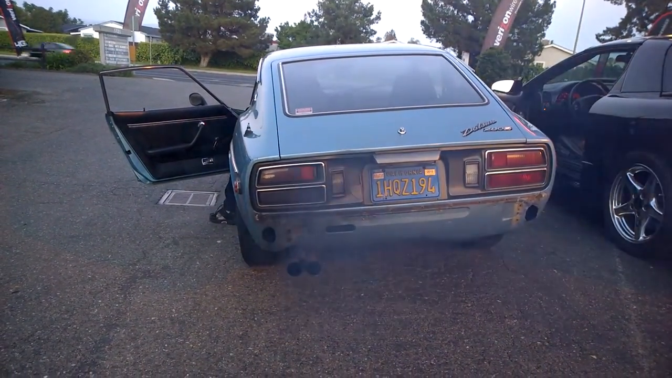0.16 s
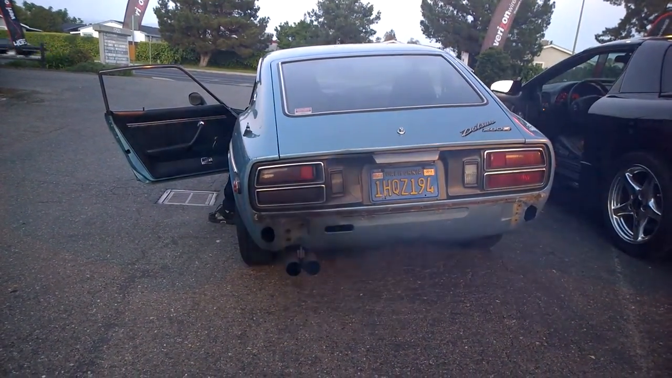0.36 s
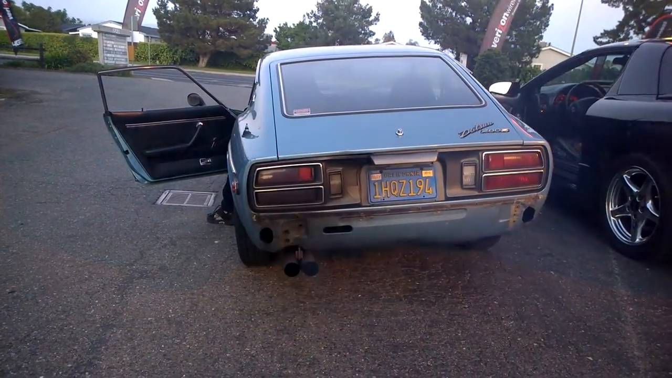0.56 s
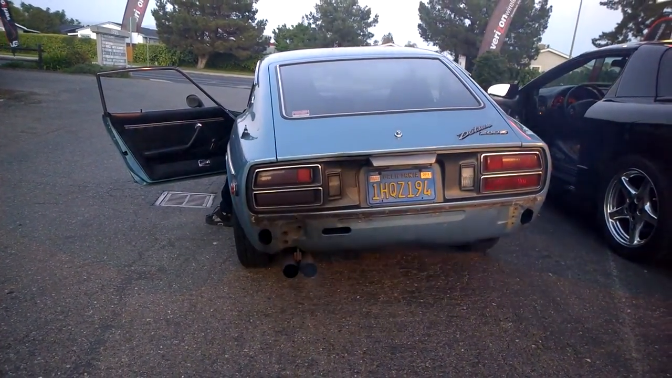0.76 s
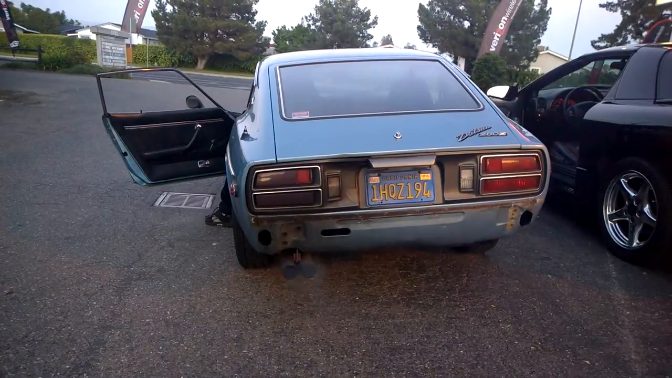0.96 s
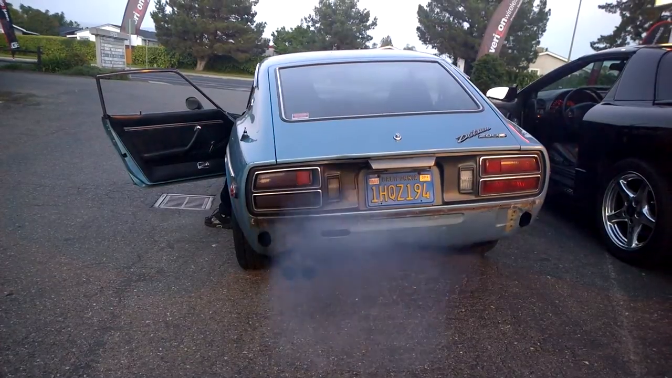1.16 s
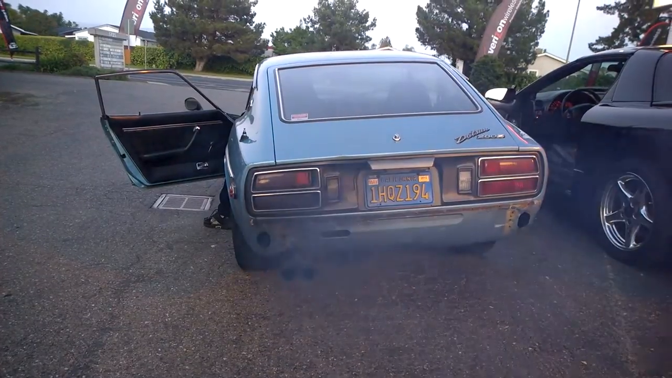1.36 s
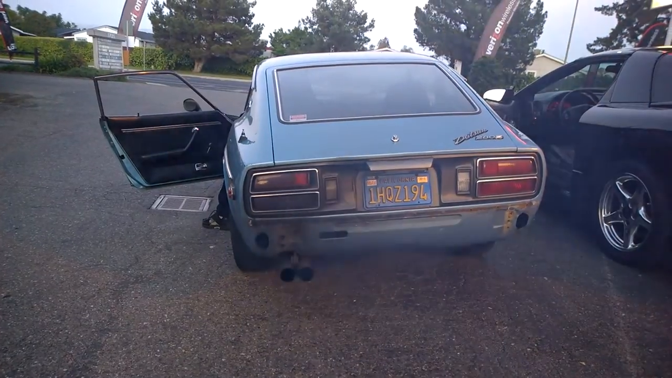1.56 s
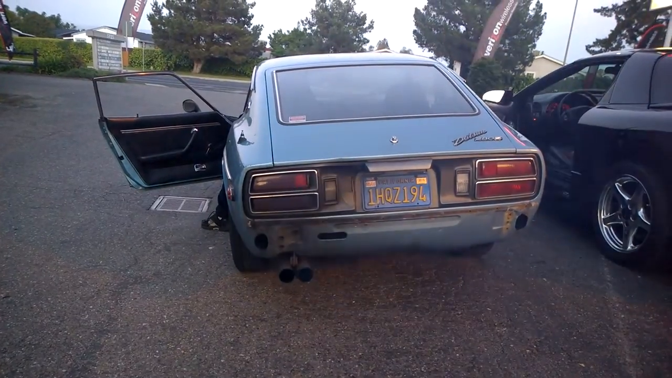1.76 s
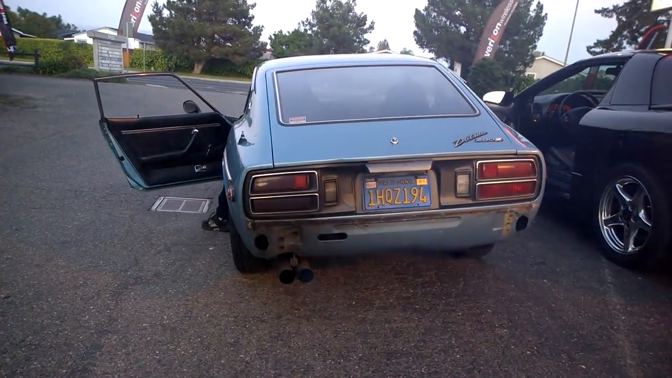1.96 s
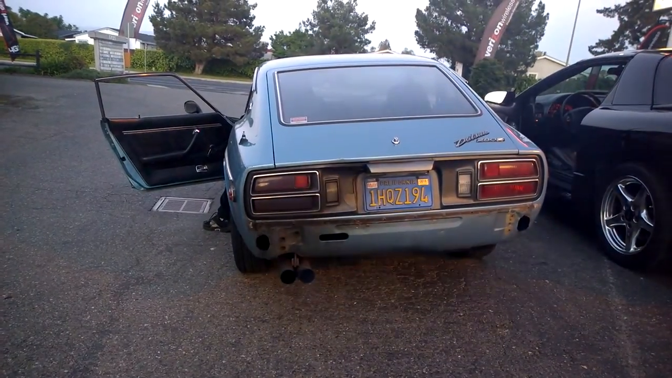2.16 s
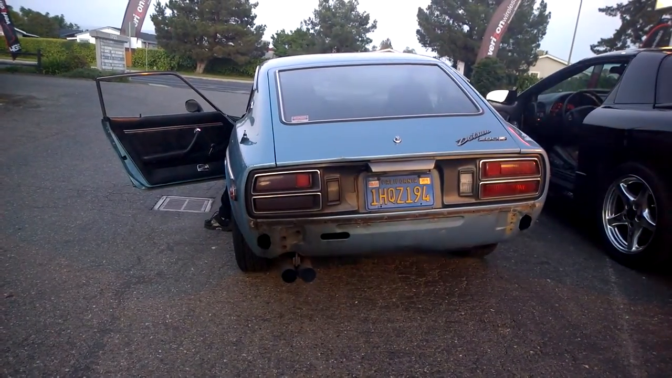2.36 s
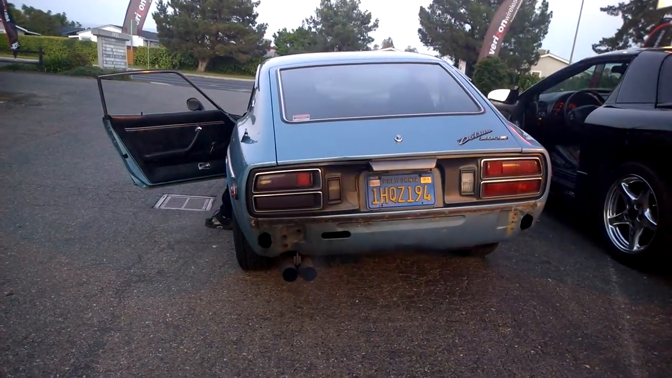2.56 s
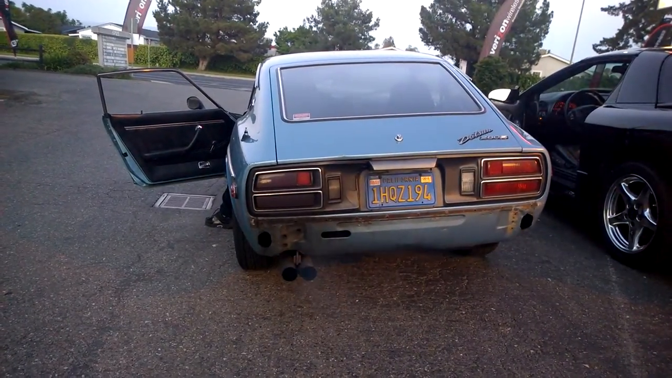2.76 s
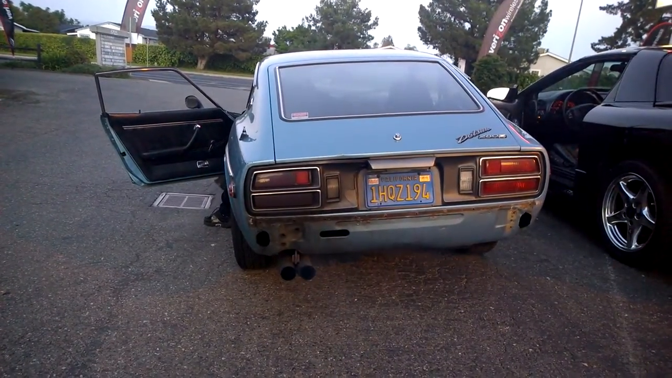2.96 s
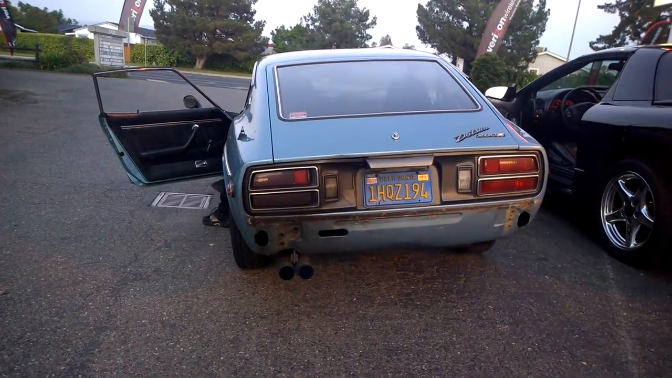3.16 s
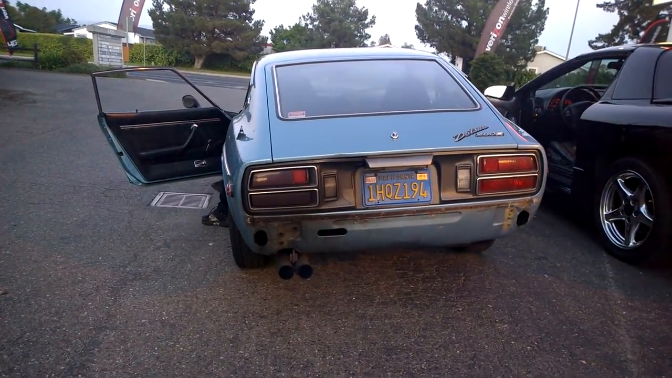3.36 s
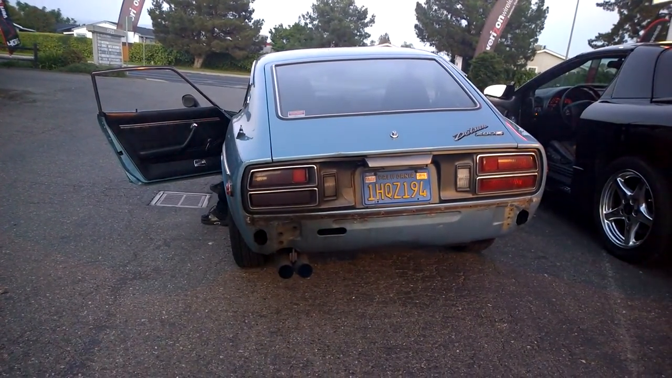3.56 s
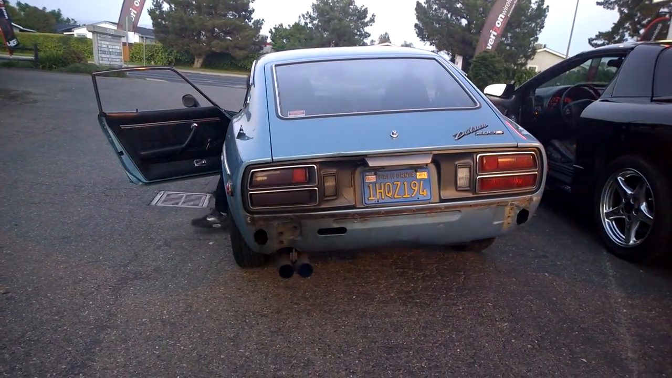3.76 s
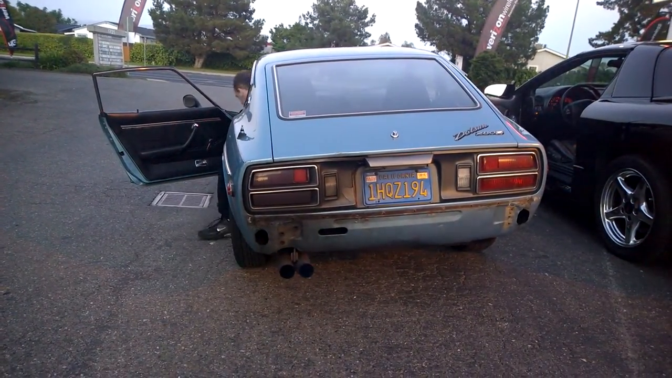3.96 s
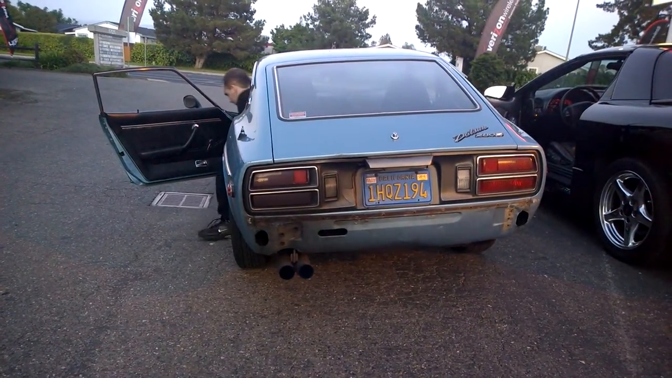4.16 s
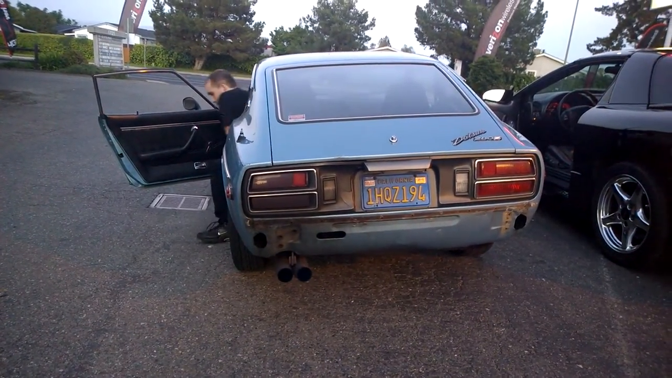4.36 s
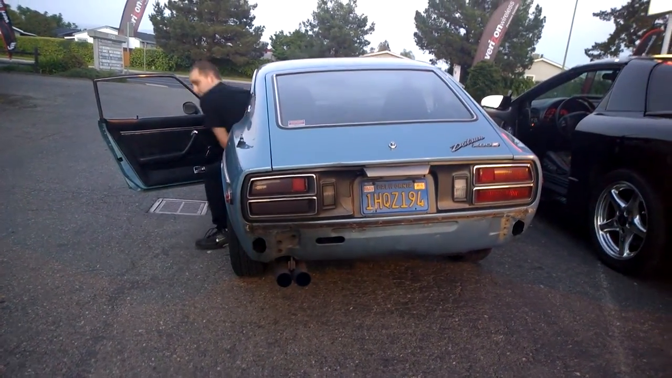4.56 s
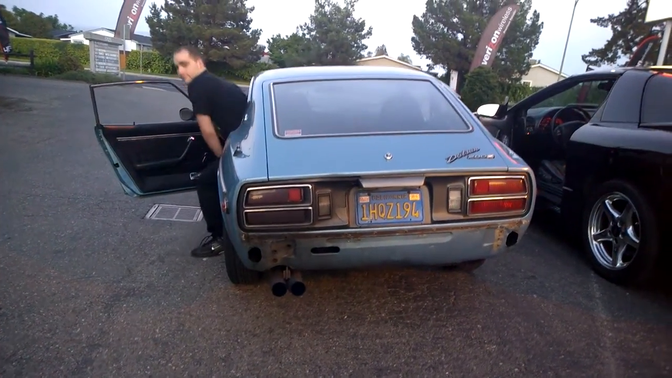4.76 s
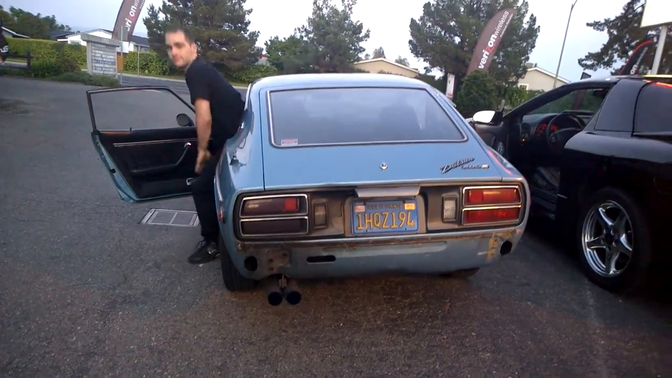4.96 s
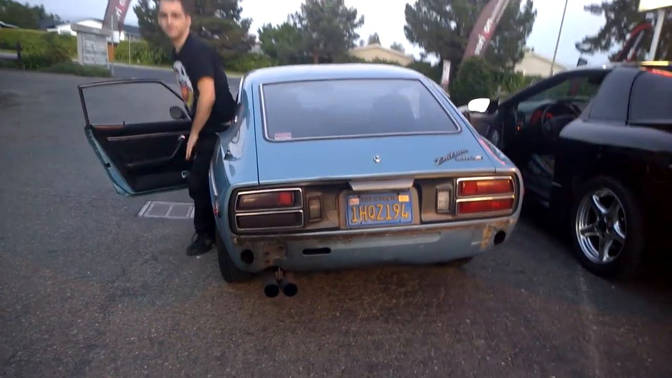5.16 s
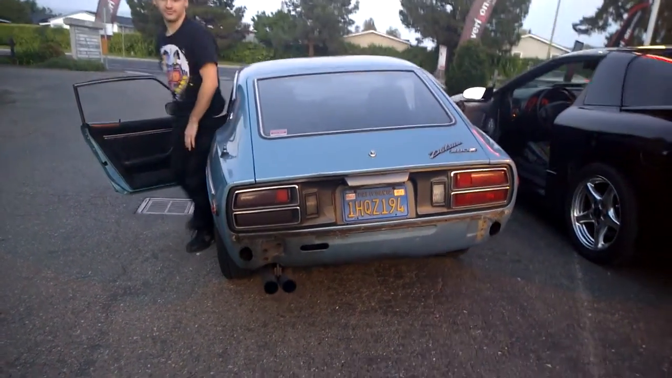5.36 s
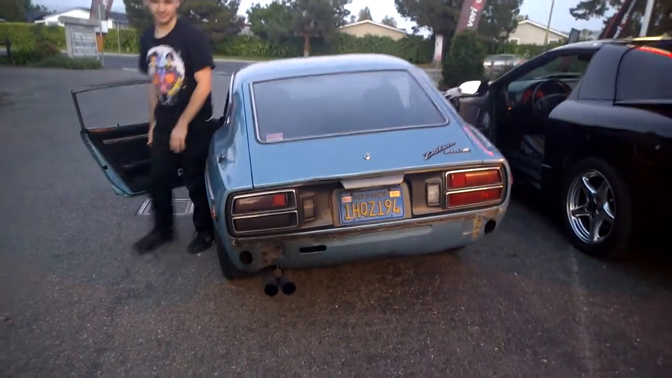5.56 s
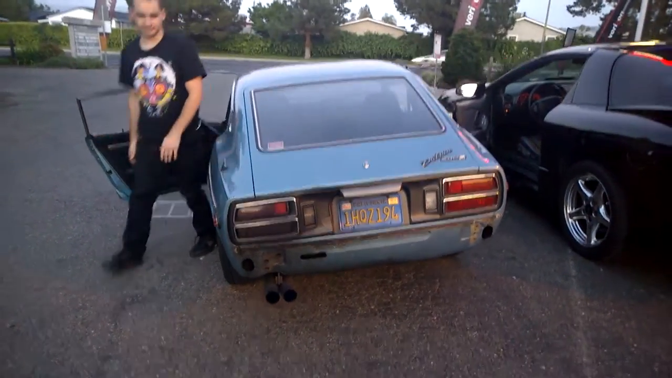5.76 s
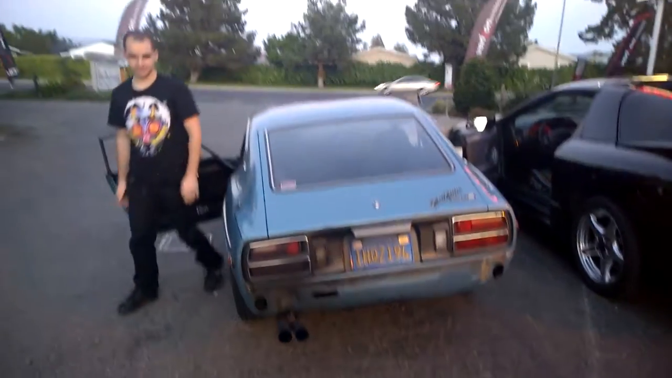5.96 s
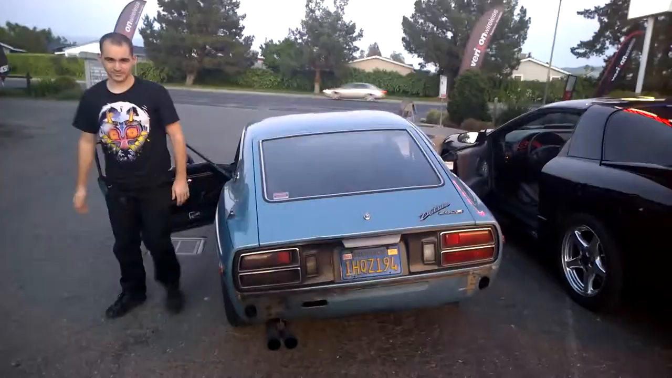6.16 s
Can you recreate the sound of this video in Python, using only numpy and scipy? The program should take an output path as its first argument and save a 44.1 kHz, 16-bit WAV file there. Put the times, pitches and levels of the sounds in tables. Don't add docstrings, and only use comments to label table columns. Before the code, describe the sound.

Close behind a parked six-cylinder car outdoors, a hollow exhaust drone falls from an earlier rev with a few thumps. A throttle blip at one second barks upward, raspy and crackling, then pops and descends for several seconds. A last dull backfire comes past three seconds, then a soft, lumpy idle. Quick faint pump ticks, valve clatter and belt whirr emerge, with distant traffic underneath. Nearly centred stereo, dry open air.

```python
import sys
import numpy as np
from scipy import signal
from scipy.fft import rfft, irfft
from scipy.io import wavfile
from scipy.ndimage import uniform_filter1d

SR = 44100
rng = np.random.default_rng(int(sys.argv[2]) if len(sys.argv) > 2 else 0)


def gain_from_decibels(decibels):
    exponent = np.asarray(decibels, float) / 20
    return 10 ** exponent


def store_pcm(level_fs):
    pcm = np.round(np.clip(level_fs, -1, 1) * 32767).astype(np.int16)
    wavfile.write(sys.argv[1], SR, np.atleast_2d(pcm).T)


N = 273420
TIME = np.arange(N) / SR
HZ = np.maximum(np.fft.rfftfreq(N, 1 / SR), 1)
REFUEL_S = 2.585


def at_hz(points, hz):
    table = np.array(points)
    return np.interp(np.log(hz), np.log(table[:, 0]), table[:, 1])


def in_time(rows):
    s, *columns = np.transpose(rows)
    return [np.interp(TIME, s, c) for c in columns]


def smooth(coarse):
    return np.interp(np.arange(N) / 64, np.arange(len(coarse)), coarse)


def ramp(up_s, full_s, hold_s, down_s):
    hold_s = max(hold_s, full_s)
    return np.interp(TIME, [up_s, full_s, hold_s, max(down_s, hold_s + .01)], [0, 1, 1, 0])


def onset(up_s, full_s):
    return ramp(up_s, full_s, 7, 8)


def rms_one(x):
    return x / np.sqrt(np.mean(x ** 2) + 1e-20)


def drift(rate_hz):
    r = np.exp(-64 * np.pi * rate_hz / SR)
    slow = signal.lfilter([1], [1, -2 * r, r * r], rng.standard_normal(N // 32 + 1502))[1500:]
    return np.interp(np.arange(N) / 32, np.arange(len(slow)), rms_one(slow))


def band(x, low_hz, high_hz):
    return signal.sosfilt(signal.butter(2, [low_hz, high_hz], "band", fs=SR, output="sos"), x)


def resonate(x, hz, width_hz):
    return signal.lfilter(*signal.iirpeak(hz, hz / width_hz, fs=SR), x)


def causal(points):
    ceps = irfft(at_hz(points, HZ) * np.log(10) / 20, N)
    ceps[1:N // 2] *= 2
    ceps[N // 2 + 1:] = 0
    return np.exp(rfft(ceps))


def delay(s):
    return np.exp(-2j * np.pi * HZ * s)


def strikes(rows, column):
    table, clicks = np.array(rows), np.zeros(N)
    clicks[(table[:, 0] * SR).astype(int)] = gain_from_decibels(table[:, column])
    return clicks


def dying(clicks, rise_s, fall_s):
    t = np.arange(2000) / SR
    shape = np.exp(-t / fall_s) - np.exp(-t / rise_s)
    return signal.fftconvolve(clicks, shape / shape.max())[:N]


def half_beats(firings):
    return np.diff((2 * firings).astype(int), prepend=0)


# hz, side_minus_mid_db
WIDTH = [(60, -27), (110, -28), (200, -25), (380, -17), (700, -8), (1290, -4), (2380, -5), (4400, -2),
         (8120, -1), (15000, 0)]


def coloured(spectrum, gate, narrow_db=0.0):
    shape = gain_from_decibels(at_hz(spectrum, HZ))
    mid, side = rfft(rng.standard_normal((2, N)) * gate) * shape / np.sqrt(np.mean(shape ** 2))
    return irfft(np.array([mid, side * gain_from_decibels(at_hz(WIDTH, HZ) - narrow_db)]), N)


# hz, level_db_per_hz
TRAFFIC = [(330, -31), (560, 1.5), (750, 1), (1090, -5), (1400, -14.5), (1910, -12), (2660, -21.5),
           (4100, -22.5), (4910, -17), (9060, -38), (15600, -60)]
TRAFFIC_DB, TYRES_DB = -64.5, -75
NEARING_S, NEARING_DB = 5.24, 2


def traffic():
    level = gain_from_decibels(TRAFFIC_DB + NEARING_DB * onset(NEARING_S, NEARING_S + 1))
    hum = level * coloured(TRAFFIC, gain_from_decibels(1.0 * drift(1.0)), narrow_db=-5.5)
    tyres = rms_one(band(rng.standard_normal((2, N)), 1900, 2750))
    return hum + gain_from_decibels(TYRES_DB) * onset(NEARING_S + .2, NEARING_S + 0.93) * tyres


WHIRR_HZ, WHIRR_WIDTH_HZ = 1974, 98
WHIRR_DB, WHIRR_DB_PER_OCTAVE = -64, 16.5
WHIRR_HIDDEN_S, WHIRR_HIDDEN_DB = 4.5, -7.5


def whirr(rate):
    narrow = resonate(rng.standard_normal((2, N)), WHIRR_HZ, WHIRR_WIDTH_HZ)
    level_db = WHIRR_DB + WHIRR_DB_PER_OCTAVE * np.log2(np.minimum(rate / 50, 1)) + 2.0 * drift(16)
    level_db = level_db + WHIRR_HIDDEN_DB * onset(WHIRR_HIDDEN_S, WHIRR_HIDDEN_S + .4)
    return rms_one(narrow) * gain_from_decibels(level_db + [[0], [-7]])


# start_s, peak_db, broad_tick_db
PUMP = [(2.5213, -67, -75), (2.5495, -61, -75), (2.5917, -57, -68), (2.6405, -58, -70),
        (2.6898, -58, -67.5), (2.7362, -54.5, -64), (2.7845, -57, -70), (2.8385, -52.5, -66.5),
        (2.887, -57, -70.5), (2.941, -60, -73.5), (2.9996, -58, -80), (3.0575, -55.5, -71.5),
        (3.1177, -59, -78), (3.1793, -57.5, -76), (3.2292, -65, -93), (3.295, -63, -78.5),
        (3.3698, -52.5, -68), (3.4247, -58, -74.5), (3.5268, -63, -81), (3.5714, -59, -73),
        (3.6758, -69.5, -93.5), (3.7283, -62.5, -78.5), (3.8922, -68.5, -86.5), (4.0698, -69, -101.5),
        (4.114, -66, -86), (4.1556, -63.5, -75), (4.2049, -66, -75.5), (4.2588, -62, -93),
        (4.307, -81, -101), (4.3573, -66, -80)]
# start_s, peak_db
PUMP_LOW = [(4.4583, -67), (4.512, -68), (4.563, -64.5), (4.6124, -63), (4.7326, -74), (4.7887, -67),
            (4.8314, -68.5), (4.8833, -70.5), (4.943, -64), (5.0704, -67), (5.1168, -65.5), (5.1906, -68.5),
            (5.243, -69), (5.3946, -64), (5.4604, -70), (5.5952, -73), (5.6595, -71), (5.7004, -80),
            (5.7523, -71), (5.794, -72.5), (5.8566, -74), (5.9136, -69), (5.9708, -74), (6.0097, -71),
            (6.0502, -66.5), (6.1018, -70), (6.1584, -66.5)]
# start_s, peak_db
REBOUNDS = [(2.6244, -60), (2.6657, -57), (2.7154, -57.5), (2.799, -58), (2.915, -72), (3.03, -73.5),
            (3.1536, -66.5), (3.242, -59), (3.2796, -75.5), (3.3089, -63), (3.333, -69.5), (3.6461, -67.5),
            (3.7998, -78.5), (3.8153, -66), (3.9345, -70), (3.9524, -78), (3.976, -70), (4.0073, -66.5),
            (4.3799, -71), (4.4034, -76)]
ASIDE_S = 5.5


def pump():
    white = rng.standard_normal((4, 2, N))
    early, later, rebound = strikes(PUMP, 1), strikes(PUMP_LOW, 1), strikes(REBOUNDS, 1)
    aside = TIME > ASIDE_S
    before, after = later * ~aside, later * aside
    high_clicks = early + before * gain_from_decibels(-9.0) + rebound * gain_from_decibels(-2.5)
    low_clicks = early * gain_from_decibels(-5.5) + before
    broad_clicks = strikes(PUMP, 2) * gain_from_decibels(-3.0) + before * gain_from_decibels(-20.0) + after * gain_from_decibels(-24.0)
    broad_clicks = broad_clicks + rebound * gain_from_decibels(-18.0)

    high = rms_one(band(white[0], 7370, 8200)) * dying(high_clicks, 0.0007, 0.008) * gain_from_decibels(-4.5)
    low = rms_one(band(white[1], 3600, 5800)) * dying(low_clicks, 0.0022, 0.022) * gain_from_decibels(-2.5)
    late_ring = band(band(white[3], 4700, 6500), 4700, 6300)
    late = rms_one(late_ring) * dying(after, 0.0015, 0.008) * gain_from_decibels(1.5)
    hiss = band(white[2], 10500, 12500) + 0.4 * band(white[2], 8800, 14000)
    hiss = hiss + 0.8 * band(white[2], 14200, 16000)
    broad = rms_one(hiss) * dying(broad_clicks, .0015, 0.005) * gain_from_decibels(2.0)
    return (high + low + late + broad) * gain_from_decibels([[0], [-1.5]])


# start_s, peak_db
TICKS = [(2.5932, -62), (2.64, -60.5), (2.6882, -60.5), (2.7355, -57), (2.7842, -62.5), (2.8381, -56.5),
         (2.8856, -61.5), (2.943, -63.5), (2.999, -63.5), (3.0574, -60.5), (3.1172, -64.5), (3.178, -62),
         (3.23, -66), (3.2975, -73), (3.3702, -55.5), (3.4272, -63.5), (3.524, -69.5), (3.5724, -67.5),
         (3.7255, -68.5), (3.8902, -76), (4.113, -67.5), (4.1606, -71.5), (4.2093, -64), (4.2618, -75.5),
         (4.3564, -73.5)]


def ticks():
    white = rng.standard_normal((2, N))
    chuff = band(white, 10600, 12600) + 0.5 * band(white, 6500, 15700) + 0.6 * band(white, 14300, 15900)
    return rms_one(chuff) * dying(strikes(TICKS, 1), 0.0012, 0.008) * gain_from_decibels([[-7.5], [-9]])


# hz, level_db_per_hz
VALVES = [(760, -16), (1300, -24), (1520, -1), (1930, -1), (2560, -4.5), (2870, -11), (3420, -7),
          (4210, -12), (4870, -8.5), (7010, -17.5), (7860, -15.5), (9280, -26), (11700, -20.5),
          (13900, -38), (15600, -20.5)]
# centre_hz, width_hz, level_db
CASING = [(1816, 130, -5.5), (2520, 7.9, -16.5), (3080, 320, -13.5), (4750, 140, -13), (7700, 210, -23)]


def valves(firings, valve_db):
    bunches = 2.6 + np.exp(-4.0 * (2 * firings % 1))
    gate = rms_one(bunches * gain_from_decibels(0.32 * drift(60) + .6 * drift(2.8)))
    out = coloured(VALVES, gate)
    taps = gate * rng.standard_normal((2, N)) * gain_from_decibels([[0], [-5]])
    for hz, width_hz, db in CASING:
        out += gain_from_decibels(db) * rms_one(resonate(taps, hz, width_hz))
    return gain_from_decibels(valve_db - 1.0) * out


# time_s, firings_per_s
SPEED = [(0.0, 119.3), (0.31, 105.2), (0.95, 78.5), (1.03, 82), (1.14, 99), (1.23, 117.8), (1.32, 119.7),
         (1.55, 110), (1.88, 93.6), (2.38, 73), (2.57, 67.7), (2.95, 53.7), (3.39, 44.3), (3.87, 35.6),
         (4.28, 30.4), (4.85, 26.7), (5.5, 22.85), (6.2, 21.3)]


def speed():
    return in_time(SPEED)[0]


# time_s, pulse_strength_db, unevenness_db
BURN = [(0.0, -3, -41), (0.07, -3.5, -22), (0.21, 2, -27), (0.3, -1, -29.5), (0.92, -0.5, -32.5),
        (0.97, 1, -29.5), (1.03, 3.5, -58), (1.26, -5, -45.5), (1.31, 1.5, -19.5), (1.4, 0.5, -37),
        (1.5, -0.5, -30), (2.57, -1, -33.5), (2.62, 2, -27), (3.15, -3.5, -39), (3.45, -2, -40.5),
        (3.85, -0.5, -38.5), (4.6, -0.5, -50), (6.2, -6.5, -46.5)]


def burn():
    return in_time(BURN)


# pedal_down_s, jet_peak_s, pedal_lift_s
BLIPS = [
    (-0.3, -0.045, 0.0029),
    (0.963, 1.154, 1.257),
]
OPEN_S, SHUT_S, JET_DIES_S = 0.097, 0.058, 0.11
FIRST_RUSH = 0.77


def pedal():
    opening = rush = build = spit = 0
    for down, peak, lift in BLIPS:
        opening = opening + ramp(down, down + OPEN_S, lift + 0.0026, lift + 0.0058 + SHUT_S)
        rush = rush + ramp(down + 0.012, down + 0.047, lift + 0.018, lift + 0.036)
        build = build + ramp(down + 0.023, peak + 0.022, lift - .01, lift + 0.019)
        spit = spit + ramp(down, peak, peak + 0.011, peak + JET_DIES_S) ** 1.3
    return opening, FIRST_RUSH * rush + (1 - FIRST_RUSH) * build, spit


CYLINDERS = [-2.2, -3, -1.3, -3, -3, -3]


def surplus(firings):
    count = int(firings[-1]) + 2
    return np.resize(CYLINDERS, count) + 0.31 * rng.standard_normal(count)


# hz, level_db_per_hz
RASP = [(310, -64.5), (520, -13.5), (626, -13.5), (691, -2.5), (1000, -8.5), (1370, -20), (1530, -29.5),
        (1870, -17), (2490, -31), (3810, -25), (4590, -34), (5000, -33), (9620, -48.5), (11600, -49),
        (15600, -55)]


def rasp(firings, rate, extra, rasp_db):
    uneven = gain_from_decibels(1.0 * uniform_filter1d(extra[firings.astype(int)], size=90))
    gate = (2.0 + np.exp(-3.5 * (firings % 1))) * uneven
    hiss = coloured(RASP, rms_one(gate), narrow_db=3.5)
    fronts = np.diff(firings.astype(int), prepend=0) / np.sqrt(rate)
    rung = rms_one(band(irfft(rfft(fronts) * causal(RASP), N), 600, 1400))
    hiss[0] += .55 * np.clip(rate / 50 - 1, 0, 1) * rung
    return gain_from_decibels(rasp_db - 2.5) * hiss


SOFTEN_S, SOFTEN_SHARE = 0.04, 0.75


def dulled(x):
    lifting = sum(ramp(lift - SOFTEN_S, lift + .025, lift + 0.033, lift + 0.049) for _, _, lift in BLIPS[1:])
    treble = signal.sosfilt(signal.butter(1, 2500, "high", fs=SR, output="sos"), x)
    return x - SOFTEN_SHARE * lifting * treble


VALVE_TOP_DB = -51


def jet(firings, extra, treble_db):
    level = np.sqrt(np.maximum(gain_from_decibels(treble_db) ** 2 - gain_from_decibels(VALVE_TOP_DB) ** 2, 0))
    gate = (.25 + np.exp(-6.0 * (2 * firings % 1))) * gain_from_decibels(3.0 * extra[firings.astype(int)])
    torn = band(coloured(RASP, rms_one(gate), narrow_db=4.5), 1100, 11000)
    return level * gain_from_decibels(6.5) * torn / np.std(torn[0])


# start_s, peak_db
SPITS = [(0.9968, -42.5), (1.0274, -40.5), (1.0407, -46), (1.0412, -41.5), (1.0638, -34), (1.075, -35.5),
         (1.0912, -33), (1.11, -24.5), (1.134, -25.5), (1.1539, -24.5), (1.1684, -21), (1.1943, -23),
         (1.2219, -26), (1.2457, -34.5)]


def spits():
    torn = coloured(RASP, dying(strikes(SPITS, 1), 0.00043, 0.0019), narrow_db=-1.0)
    return band(torn, 2400, 6500) * gain_from_decibels(9.5) + band(torn, 7600, 13000) * gain_from_decibels(7.5)


# start_s, crack_db, thump_db
POPS = [(0.02, -24.5, -22), (0.06, -40.5, -13), (0.111, -36, -19.5), (0.163, -31.5, -14.5),
        (0.1815, -47.5, -23), (0.991, -32, -21.5), (1.064, -22, -23), (1.105, -16, -31),
        (1.138, -19, -12.5), (1.169, -23, -22), (1.1965, -10, -11.5), (1.2225, -11, -13),
        (1.2482, -14.5, -13.5), (1.273, -18.5, -24.5), (1.318, -53.5, -24.5), (1.343, -48.5, -17),
        (1.449, -26, -13), (1.483, -30.5, -18.5), (2.592, -32.5, -16.5), (2.7992, -36, -17),
        (2.884, -38.5, -18.5), (3.3706, -33.5, -69)]


def pops():
    kick = causal([(30, -31.0), (90, 5.0), (160, 15.0), (200, 2.0), (265, -1.5), (330, 3.5), (420, -7.5),
                   (560, -25.5), (1000, -39.0), (8000, -80)])
    kick = kick * delay(-0.0004) * (1 + 0.56 * delay(0.01011))
    snap = causal([(350, -32.5), (760, 21.0), (1250, -5.0), (1550, -21.5), (2000, -7.5), (3000, -28.5),
                   (12000, -46.5)]) * delay(-0.0006)
    cracks = strikes(POPS, 1)
    thump = irfft(rfft(strikes(POPS, 2)) * kick, N) / np.abs(irfft(kick, N)).max() * gain_from_decibels(5.0)
    thump += irfft(rfft(cracks) * snap, N) / np.abs(irfft(snap, N)).max() * gain_from_decibels(1.0)
    crack = coloured(RASP, dying(cracks, 0.00018, 0.0057), narrow_db=-1.0) * gain_from_decibels(-10.0)
    return thump, band(crack, 450, 7000)


BACKFIRE_S, BACKFIRE_DB, PUSH_S, PULL_HZ = 3.3703, -5.5, 0.001, 55
RETURN_S, RETURN_DB = 0.0096, -12.5


def backfire():
    push = strikes([(BACKFIRE_S, BACKFIRE_DB)], 1)
    echo = strikes([(BACKFIRE_S + RETURN_S, BACKFIRE_DB + RETURN_DB)], 1)
    hump = dying(push, PUSH_S, 1.3 * PUSH_S)
    back = dying(echo, 1.5 * PUSH_S, 2.2 * PUSH_S)
    return band(hump + back, PULL_HZ, 600)


# start_s, level_db
KNOCKS = [
    (2.593, -31.5),
    (2.8, -50),
    (2.884, -34.5),
    (3.3708, -23),
]


def knocks():
    return resonate(dying(strikes(KNOCKS, 1), .0001, 0.00011), hz=1124, width_hz=142) * gain_from_decibels(13.0)


# start_s, level_db
BOOMS = [
    (0.04, -13.5),
    (0.165, -20.5),
    (1.312, -14.5),
    (1.465, -19.5),
    (3.37, -40),
]
BOOM_HZ, BOOM_FALL_S = 59.5, 0.0099


def booms():
    t = np.arange(8000) / SR
    swell = t / BOOM_FALL_S * np.exp(1 - t / BOOM_FALL_S)
    return signal.fftconvolve(strikes(BOOMS, 1), np.sin(2 * np.pi * BOOM_HZ * t) * swell)[:N]


# hz, gain_db
PIPE = [(20, -1), (52, -1), (70, 10), (88, 0.5), (105, -2), (150, -2.5), (200, -10.5), (265, -2.5),
        (330, -24.5), (405, -21), (470, -34), (580, -42), (760, -58), (1200, -41.5), (4000, -110)]


def pipe_db(hz, rate):
    hz, rate = hz[::64], rate[::64]
    return smooth(at_hz(PIPE, hz) + 3.6 * np.log2(hz / 150) * np.log2(rate / 40))


def rumble(firings, rate, uneven_db):
    puffs = half_beats(firings) * rng.standard_normal(N)
    puffs = puffs / np.sqrt(uniform_filter1d(puffs ** 2, size=12000) + 1e-9)
    flow = puffs + 0.86 * rng.standard_normal(N)
    piped = rms_one(irfft(rfft(flow) * causal(PIPE), N))
    pace = np.log2(rate / 40)
    return gain_from_decibels(uneven_db + 7.5) * (piped * gain_from_decibels(-5.0 * pace) + band(piped, 340, 1400) * gain_from_decibels(7.7 * pace - 5.5))


OVERRUN_CUT_HZ = 70


def thinned(x, opening):
    burning = np.maximum(onset(REFUEL_S - .02, REFUEL_S + .02), opening)
    return burning * x + (1 - burning) * band(x, OVERRUN_CUT_HZ, 6000)


# centre_hz, width_hz, level_db
PUTTER_RINGS = [(77, 16, -7.5), (208.7, 17, -2), (260.97, 27, 0.5), (317, 34, -9.5), (466, 14, -0.5)]
PUTTER_DB, PUTTER_SPREAD_DB, PUTTER_CUT_HZ = -40.5, 4.5, 330


def putter(firings):
    beat = half_beats(firings) * (TIME > REFUEL_S)
    sizes = gain_from_decibels(PUTTER_SPREAD_DB * rng.uniform(-1.7, 1.7, N // 100)) * rng.choice([-1, 1, 1], N // 100)
    soft = signal.butter(6, PUTTER_CUT_HZ, fs=SR, output="sos")
    slugs = signal.sosfilt(soft, -beat * sizes[(2 * firings).astype(int)] + 1e-18)
    rung = sum(gain_from_decibels(db) * resonate(slugs, hz, width_hz) for hz, width_hz, db in PUTTER_RINGS)
    return gain_from_decibels(PUTTER_DB + .8 * drift(4.0)) * rms_one(rung)


SINGING_DB = -50.5


def singing(firings, rate, opening):
    level = gain_from_decibels(SINGING_DB + 6 * np.log2(rate / 100))
    coasting = (1 - opening) * (1 - onset(REFUEL_S - .02, REFUEL_S)) * level
    lines = 0
    for k in range(7, 14):
        tone = np.sin(2 * np.pi * k * firings + 2.1 * k * k)
        lines = lines + gain_from_decibels(at_hz(RASP, k * rate) + 2 * drift(3.0)) * tone
    return coasting * lines


# start_s, end_s, lope_db, upper_order_loss_db
STUMBLES = [
    (0.035, 0.26, -35.5, 19),
    (1.313, 1.376, -43, 3),
    (1.437, 1.531, -31.5, 30),
    (2.578, 2.69, -32.5, 12.5),
    (3.368, 3.457, -57, 15),
]


def lope_level(rate, opening):
    stumble = sum(gain_from_decibels(db) * ramp(a, a + 0.015, b - .03, b) for a, b, db, _ in STUMBLES)
    idle = onset(REFUEL_S - .03, REFUEL_S) * gain_from_decibels(-37.5 + 8.5 * np.log2(rate / 40))
    return 20 * np.log10(gain_from_decibels(-48.5) + opening * gain_from_decibels(-22) + stumble + idle)


THIRDS_DB = [-14, -2, 11.5, 9.5, -4, -6, -5.5, 6.5, 2.5, 7.5, -2.5, 6.5]
HALF_TURN_DB = -16


def lope(firings, rate, lope_db):
    out, idle = np.zeros(N), onset(REFUEL_S - .03, REFUEL_S)
    coasting = (1 - idle) * (1 - pedal()[0])
    pattern = dict(zip([k for k in range(1, 19) if k % 3], THIRDS_DB))
    for k in range(2, 90):
        if k % 6 == 0 or (k % 2 and k >= 44):
            continue
        share = gain_from_decibels(HALF_TURN_DB) * idle if k % 2 else gain_from_decibels(pattern.get(k // 2, -2.0) * coasting)
        knots_s = np.linspace(0, TIME[-1], 16)
        slow, turn = [np.interp(TIME, knots_s, w) for w in rng.standard_normal((2, 16))]
        level = share * gain_from_decibels(pipe_db(k / 6 * rate, rate) + (1 + idle) * slow)
        out += level * np.sin(2 * np.pi * k / 6 * firings + .09 * k * k + .3 * turn)
    return gain_from_decibels(lope_db - 2.0) * out


ORDERS_DB = [-1, -1.5, -15.5, -10, -13.5, -14.5]
THROTTLE_DB = [-18, 1.5, -13.5, -6.5, -40.5, -28.5]
REFUELLED_DB = [5, -2.5, -6, -3, -11.5, -1.5]
# centre_hz, width_hz, level_db
STANDING = [(36, 10, -50), (70.1, 13, -18.5), (100.1, 17, -18), (107, 33, -23), (147, 34.6, -14),
            (204.9, 20, -25), (245, 61, -24), (264.3, 11, -17.5), (304.4, 28, -25), (338, 16, -39),
            (334, 110, -29), (387, 30, -26.5), (467, 20, -28), (550, 51, -45.5), (680, 59, -34.5)]
# hz, gain_db
HOT_PIPE = [(75, -21.5), (115, 6.5), (165, -9.5), (240, -6), (380, -16), (435, -19.5), (465, -28.5),
            (600, -29), (705, 9)]
LUMP_DB, LUMPS_PER_S = 1.5, 9.0


def orders(rate, opening, strength_db):
    levels, burning = [], onset(REFUEL_S - .02, REFUEL_S + 0.0084)
    loss_db = sum(db * ramp(a, a + 0.087, b - .04, b) for a, b, _, db in STUMBLES)
    for k, (coast_db, open_db, burn_db) in enumerate(zip(ORDERS_DB, THROTTLE_DB, REFUELLED_DB), 1):
        hz = k * rate[::64]
        coast = 0
        for top_hz, width_hz, db in STANDING:
            coast = coast + gain_from_decibels(2 * db) / (1 + (2 * (hz - top_hz) / width_hz) ** 2) ** 2
        throttle = opening[::64] ** (1 + k // 4 + 2 * (k // 6))
        roar = throttle * gain_from_decibels(open_db + at_hz(HOT_PIPE, hz))
        steady_db = smooth(10 * np.log10(coast * gain_from_decibels(2 * coast_db) + roar ** 2))
        burn_change_db = burning * (burn_db + LUMP_DB * drift(LUMPS_PER_S))
        levels.append(steady_db + strength_db - loss_db * (k > 1) + burn_change_db)
    return levels


def drone(firings, rate, orders_db, upper_db):
    out = np.zeros(N)
    for k, db in enumerate(orders_db, 1):
        out += np.sqrt(2) * gain_from_decibels(db) * np.sin(2 * np.pi * k * firings + 0.8116 * k * k)
    for k in range(7, 21):
        level_db = upper_db + pipe_db(k * rate, rate) - 2.1 * (k % 2) + 4.1 * drift(4.5)
        out += gain_from_decibels(level_db) * np.sin(2 * np.pi * k * firings + 2.1 * k * k)
    return out


# time_s, depth_db
DIPS = [(3.513, -21.2), (3.5992, -22.1), (3.6765, -19.9), (3.7291, -20.9), (3.7556, -17.4), (3.8375, -17.2),
        (3.8941, -22.4), (3.9373, -18.9), (3.9958, -21.2), (4.0256, -19.6), (4.1168, -21.5),
        (4.6267, -21.7), (4.7196, -20.2), (4.8327, -20.0), (4.9888, -21.1), (5.1912, -19.9),
        (5.2315, -21.7), (5.3567, -22.5), (5.4429, -22.5), (5.5722, -22.3), (6.1063, -19.9)]
DIP_WIDTH_S, SWELL_HZ, SWELL_S, SWELL_SHARE = 0.0012, 72, 0.009, 0.42
DIP_TAKES = 0.8


def thuds(tones):
    t = np.arange(-1300, 1301) / SR
    bell, clicks = np.exp(-.5 * (t / SWELL_S) ** 2), strikes(DIPS, 1)
    dip = np.exp(-.5 * (t / DIP_WIDTH_S) ** 2)
    shape = (1 - SWELL_SHARE) * dip + SWELL_SHARE * bell * np.cos(2 * np.pi * SWELL_HZ * t)
    taken = np.clip(signal.fftconvolve(1.0 * (clicks > 0), bell, "same"), 0, 1)
    return tones * (1 - DIP_TAKES * taken) - signal.fftconvolve(clicks, shape, "same")


# delay_s, level_db
ECHOES = [
    (.0041, 9.5),
    (.0093, -14.5),
    (.017, -7.5),
    (.031, 7),
]


def outdoors(x):
    echo = sum(gain_from_decibels(db) * delay(s) * (-1) ** k for k, (s, db) in enumerate(ECHOES))
    echo = echo / np.sqrt(1 + (HZ / 300) ** 2)
    eased = x * np.minimum(1, np.minimum(np.arange(N), np.arange(N)[::-1]) / 1500)
    side = irfft(rfft(eased) * echo * gain_from_decibels(at_hz(WIDTH, HZ) - 10.0), N)
    return np.array([x, side + .012 * x])


LEAN_DB = 0.25


def scene():
    rate = speed()
    strength_db, uneven_db = burn()
    opening, flow, spit = pedal()
    octaves = np.log2(rate / 100)
    rasp_db = -45 + 11.5 * octaves + 19.5 * flow
    valve_db = -53 + 6 * octaves - 5 * octaves ** 2 + 20 * spit
    firings = np.cumsum(rate * (1 + .0015 * drift(8))) / SR
    extra = surplus(firings)

    upper_db = -33 - 4.5 * onset(REFUEL_S, REFUEL_S + .1)
    tones = drone(firings, rate, orders(rate, opening, strength_db), upper_db)
    tones = tones + lope(firings, rate, lope_level(rate, opening))
    tones = tones * np.cos(np.pi * onset(REFUEL_S, REFUEL_S + .02))
    flow_noise = thinned(rumble(firings, rate, uneven_db), opening)
    thump, crack = pops()
    pipe = thuds(tones + flow_noise + putter(firings))
    pipe = pipe + backfire() + thump + knocks() + booms() + singing(firings, rate, opening)

    tips = dulled(rasp(firings, rate, extra, rasp_db)) + jet(firings, extra, valve_db) + spits() + crack
    engine_bay = valves(firings, np.minimum(valve_db, VALVE_TOP_DB)) + whirr(rate)
    mid, side = traffic() + engine_bay + pump() + ticks() + tips + outdoors(pipe)
    return np.array([mid + side, mid - side]) * gain_from_decibels([[LEAN_DB], [-LEAN_DB]])


def band_limit(x):
    return signal.sosfilt(signal.butter(12, 15760, fs=SR, output="sos"), x)


BASS_CUT_HZ = 24


def record(dry):
    ease = np.minimum(1, np.arange(N)[::-1] / 250)
    cut = signal.sosfiltfilt(signal.butter(2, BASS_CUT_HZ, "high", fs=SR, output="sos"), dry)
    return band_limit(1.101 * np.tanh(cut / 1.545) * ease)


dry = scene()
out = record(dry)
store_pcm(out)
```